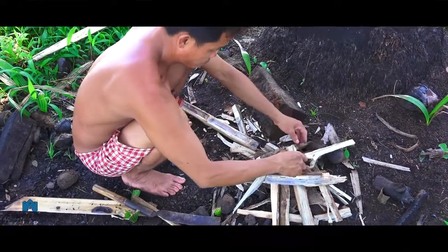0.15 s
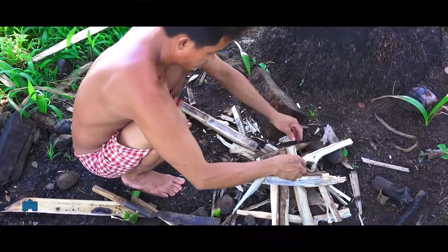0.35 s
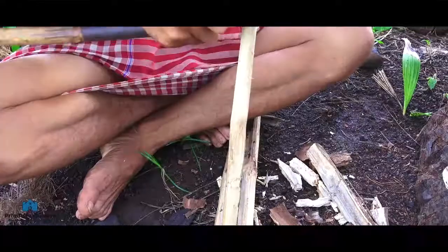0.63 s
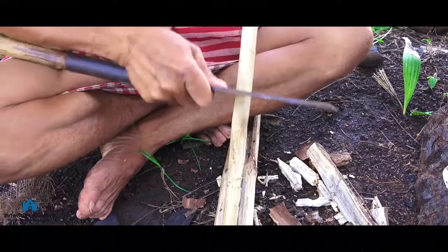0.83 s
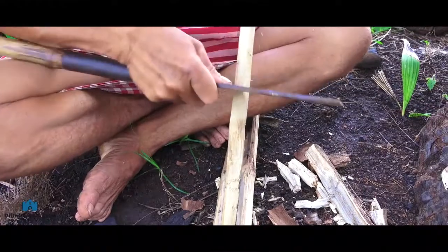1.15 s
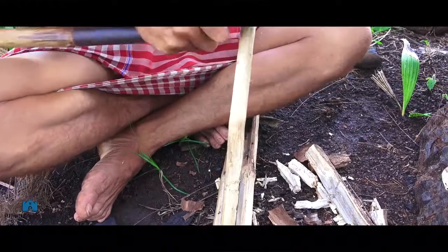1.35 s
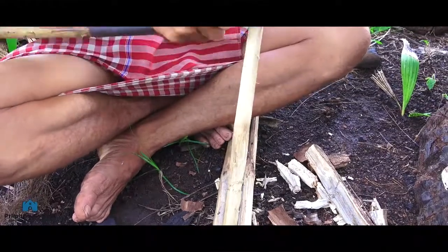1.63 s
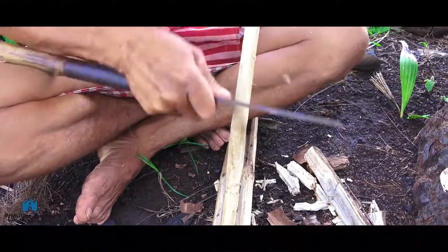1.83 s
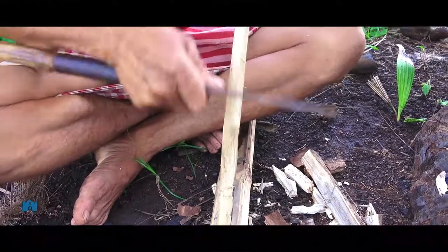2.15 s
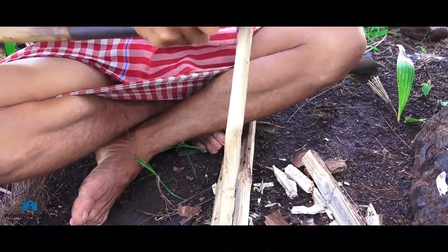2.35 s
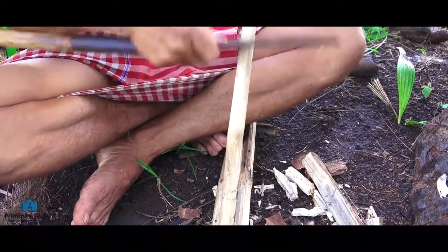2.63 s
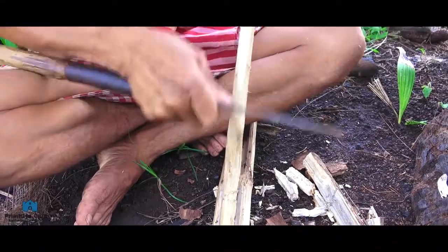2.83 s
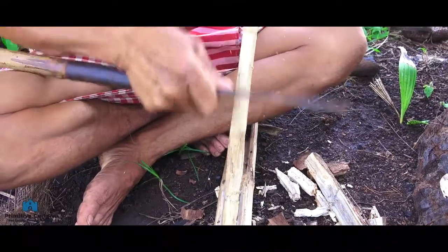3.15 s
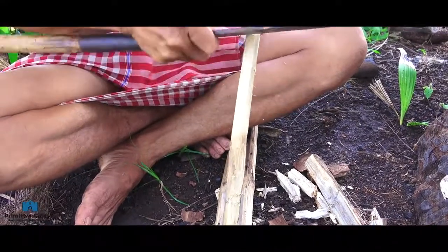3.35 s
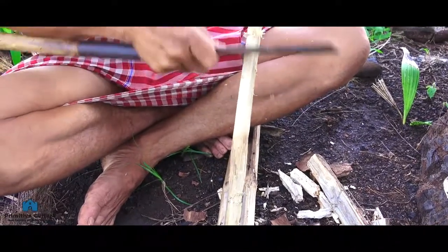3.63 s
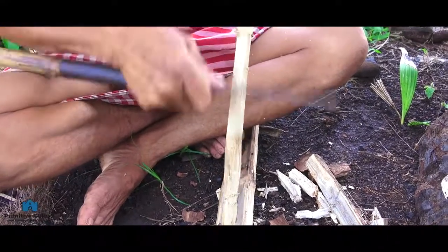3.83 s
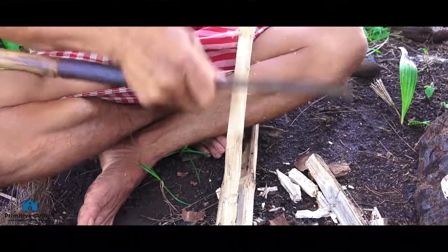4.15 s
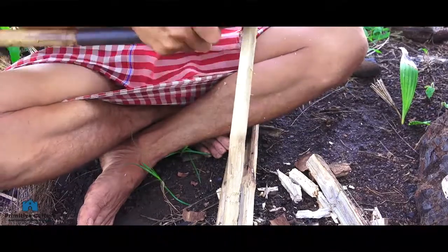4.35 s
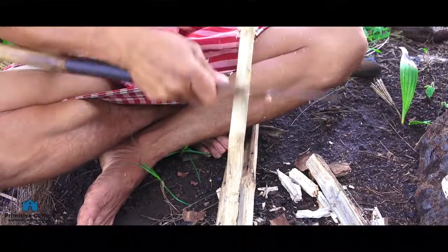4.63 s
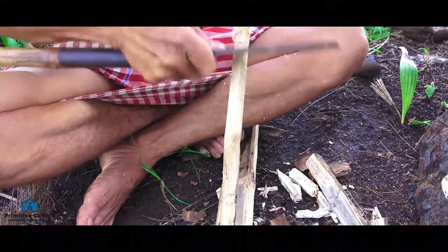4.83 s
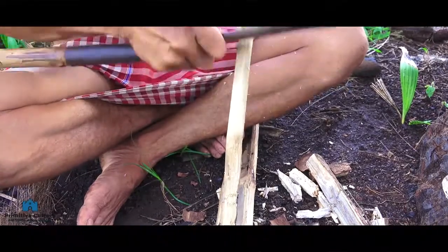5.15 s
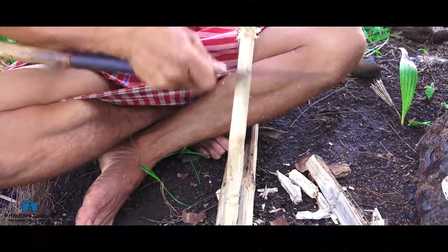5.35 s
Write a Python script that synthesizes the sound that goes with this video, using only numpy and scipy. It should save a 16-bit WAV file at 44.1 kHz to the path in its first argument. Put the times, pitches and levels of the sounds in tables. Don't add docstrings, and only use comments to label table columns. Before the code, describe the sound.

Close, dry scraping of a knife on wood, about three strokes a second, with hollow knocks between and faint leaf hiss behind.

```python
import sys
import numpy as np
from scipy import signal
from scipy.fft import rfft, irfft
from scipy.io import wavfile
from scipy.ndimage import uniform_filter1d, map_coordinates

SR = 44100
rng = np.random.default_rng(int(sys.argv[2]) if len(sys.argv) > 2 else 0)


def undo_db(level):
    steps = np.asarray(level, float) / 20
    return 10 ** steps


def wrap_up_sound(samples):
    columns = np.atleast_2d(samples).T
    tamed = np.clip(columns, -1, 1)
    steps = np.round(tamed * 32767).astype(np.int16)
    wavfile.write(sys.argv[1], SR, steps)


N = 242550


def evened(x):
    return x / np.sqrt(np.mean(x ** 2) + 1e-20)


def read(points, hz):
    f, value = np.transpose(points)
    return np.interp(np.log(hz + 1), np.log(f + 1), value)


def laid(tables, column, rest):
    out, t = np.full(N, float(rest)), np.arange(N) / SR
    for rows in tables:
        rows = np.array(rows)
        inside = slice(round(rows[0, 0] * SR), round(rows[-1, 0] * SR))
        out[inside] = np.interp(t[inside], rows[:, 0], rows[:, column])
    return out


def bumps(rows):
    t = np.arange(N) / SR
    return sum(undo_db(db) * np.exp(-((t - s) / half) ** 2) for s, half, db in rows)


def colour(x, points):
    return irfft(rfft(x) * undo_db(read(points, np.fft.rfftfreq(N, 1 / SR))), N)


def resonate(x, hz, width):
    r = np.exp(-np.pi * width / SR)
    return 2 * signal.lfilter([1 - r], [1, -r * np.exp(2j * np.pi * hz / SR)], x).real


def lumps(seconds):
    span = max(round(seconds * SR), 2)
    return evened(uniform_filter1d(uniform_filter1d(rng.standard_normal(N), span), span))


def blotchy(x, depth_db):
    z = signal.stft(x, nperseg=256)[2]
    patches = rng.standard_normal(z.shape[::-1])
    patches = uniform_filter1d(uniform_filter1d(patches, size=5, axis=0), size=6, axis=1)
    return signal.istft(z * undo_db(depth_db * evened(patches).T), nperseg=256)[1][:N]


def fibres(per_s, spread_db):
    size_db = spread_db * np.minimum(rng.exponential(1, N), 4)
    size = undo_db(size_db) * rng.choice([-1., 1.], N)
    return evened(size * (rng.random(N) < per_s / SR))


# middle in seconds, half length in seconds, level in dB.
GUSTS = [(.03, 0.057, -41), (.15, 0.098, -42.5), (.29, 0.048, -34), (.47, 0.047, -32.5),
         (.57, 0.017, -31.5), (1.06, 0.027, -51), (1.16, 0.018, -52), (1.47, 0.067, -48.5),
         (1.56, 0.032, -32.5), (1.68, 0.075, -44.5), (1.79, .04, -40), (1.88, 0.029, -37.5)]
# frequency in Hz, density in dB per Hz.
WIND_SPECTRUM = [(12, -32.5), (20, 7), (86, 4.5), (168, -1.5), (292, -19.5), (329, -13.5), (362, -34.5),
                 (500, -23.5), (650, -55.5), (1100, -120)]


def wind():
    lumpy = undo_db(2.0 * lumps(0.057))
    both, apart = (evened(colour(rng.standard_normal(N), WIND_SPECTRUM)) for _ in range(2))
    left_right_db = [[2.2], [-2.6]]
    air = both * undo_db(left_right_db) + 0.082 * apart * np.array([[1], [-1]])
    calm = signal.sosfilt(signal.butter(2, 54.6, "high", fs=SR, output="sos"), air)
    return lumpy * (bumps(GUSTS) * air + undo_db(-54) * calm)


# frequency in Hz, density in dB per Hz.
LEAVES_SPECTRUM = [(120, -7.5), (200, -9.5), (328, -13), (360, -15), (1870, -22), (3760, -24.5),
                   (5730, -24.5), (8900, -35.5), (11500, -36.5), (16000, -49)]
# time in seconds, level in dB.
LEAVES_LEVEL = [(0, -49), (.58, -48), (.62, -58), (2.5, -58), (5.5, -56.5)]
# frequency in Hz, side over mid in dB.
SIDE_OVER_MID = [(60, -15.5), (110, -5.5), (200, -7), (380, -28), (700, -10.5), (1290, -18.5),
                 (2380, -15.5), (5800, -19), (7200, 0.5), (12000, 2), (13200, -23)]


def leaves():
    both, apart = (evened(colour(rng.standard_normal(N), LEAVES_SPECTRUM)) for _ in range(2))
    swell = undo_db(1.0 * lumps(0.05))
    side = 0.97 * colour(apart, SIDE_OVER_MID) * np.array([[1], [-1]])
    return undo_db(laid([LEAVES_LEVEL], column=1, rest=-60)) * swell * (both + side)


# frequency in Hz, bandwidth in Hz, level in dB.
BLADE_MODES = [(1436, 40, -16), (1940, 25, -13), (2425, 124, -1), (3745, 78, 6.5), (4703, 43, -8.5),
               (5120, 110, -11), (6055, 140, -7.5), (6400, 70, -28), (7686, 93, -7.5), (8810, 420, -11.5),
               (10370, 130, -16.5), (12320, 130, -18.5)]


def steel(drive, ring_gain):
    modes = []
    for hz, width, db in BLADE_MODES:
        swell = undo_db(db + 3.6 * lumps(0.013) + 1.5 * lumps(0.072))
        modes.append(swell * resonate(drive, hz, width) / np.sqrt(width))
    levels_db = [db for _, _, db in BLADE_MODES]
    main = int(np.argmax(levels_db))
    scale = np.sqrt(sum(undo_db(db) ** 2 for db in levels_db) * np.pi / SR)
    return (sum(modes) + (ring_gain - 1) * modes[main]) / scale


# start in seconds, level in dB, fade in dB per second.
RETURNS = [(.72, -46.5, 79), (1.05, -47, 120), (1.38, -46, 115), (1.75, -45, 65.5), (2.09, -46, 142),
           (2.43, -46, 65.5), (2.78, -44, 129), (3.1, -43.5, 161), (3.43, -47.5, 94), (3.78, -49, 99.5),
           (4.12, -47, 170), (4.46, -43.5, 174), (4.82, -51, 102), (5.15, -43.5, 170)]
# middle in seconds, half length in seconds, level in dB.
RUSTLES = [
    (.46, .03, -56),
    (.885, 0.017, -63),
    (1.2, 0.033, -53),
    (1.81, 0.02, -45),
    (1.935, 0.019, -45.5),
    (2.265, 0.024, -54.5),
    (4.96, .03, -66),
    (2.55, .03, -56),
    (2.61, 0.042, -36.5),
    (3.6, 0.01, -75),
]
# start in seconds, level in dB, length in seconds.
TOUCHES = [(0.779, -39, 0.014), (1.116, -28.5, 0.013), (1.42, -37.5, 0.028), (1.8164, -30, 0.013),
           (2.163, -36, 0.013), (2.506, -27, 0.015), (2.85, -19, 0.017), (3.168, -23.5, 0.015),
           (3.594, -46, 0.015), (3.861, -32.5, 0.024), (4.1875, -24, 0.015), (4.537, -23, 0.013),
           (4.907, -28.5, 0.024), (4.995, -12, 0.014), (5.233, -25, 0.017)]
# frequency in Hz, density in dB per Hz.
DRAG_SPECTRUM = [(180, -35), (300, 3), (393, -10), (468, -9.5), (550, -4.5), (2770, -11.5), (3720, -3.5),
                 (7500, -10), (9750, -16), (16500, -120)]
RELEASE_S = 0.019


def returns():
    t = np.arange(N) / SR
    fading = sum(undo_db(db - fade * np.maximum(t - s, 0)) * (t > s - RELEASE_S) for s, db, fade in RETURNS)
    level = uniform_filter1d((fading + bumps(RUSTLES)) * undo_db(2.0 * lumps(0.0035)), 300)
    rub = fibres(5000, 3.8)
    fizz = signal.lfilter(*signal.butter(4, 7000, "high", fs=SR), rub)
    drag = evened(colour(rub, DRAG_SPECTRUM)) + evened(fizz) * undo_db(-9.5)
    brush = np.zeros(N)
    for s, db, length in TOUCHES:
        brush += undo_db(db - 15.5) * np.exp(-((t - s - 0.46 * length) / (0.39 * length)) ** 4)
    struck = uniform_filter1d(1. * (brush > level), size=900)
    brush *= rub
    ring = steel(undo_db(-13.0) * rub * level + undo_db(-10.5) * brush, 1.02 + 1.56 * struck)
    wide = undo_db(-7.0) * colour(brush, RASP_SPECTRUM) / np.std(colour(rub, RASP_SPECTRUM))
    skim = evened(signal.lfilter(*signal.butter(2, [400, 2600], "band", fs=SR), rub))
    approach = bumps([(row[0], 0.0082, -38.5) for row in KNOCKS])
    return drag * level + ring + wide + skim * approach


# start in seconds, length in seconds, pressure in dB,
# first bite in dB over pressure, blade ring in dB.
STROKES = [(0.605, 0.094, -13.5, -8, -2), (0.934, .1, -13.5, -4, -4), (1.274, 0.088, -15, -6, -1),
           (1.628, 0.098, -15, -1.5, -3), (1.976, 0.1, -14.5, -7, -2.5), (2.329, 0.09, -15.5, -1.5, 1),
           (2.668, 0.099, -14.5, -0.5, -1), (2.990, .097, -15, 3.5, -1), (3.328, 0.089, -14, -5.5, -2.5),
           (3.666, 0.098, -16.5, -0.5, 0.5), (4.003, 0.11, -16.5, -4.5, 0), (4.356, 0.094, -15, -7.5, -0.5),
           (4.706, 0.096, -17, 0.5, 3.5), (5.037, 0.1, -15, -5, 1.5), (5.419, 0.11, -16.5, -1.5, -2)]
# frequency in Hz, density in dB per Hz.
RASP_SPECTRUM = [(88, -66), (150, -21.5), (414, -12), (612, -17.5), (854, -18.5), (979, -12), (2140, -7.5),
                 (2450, -19), (2870, -10.5), (3770, -6), (4410, -7), (7620, -12.5), (16000, -46.5)]
ATTACK_S, SLACK_S, PEAK_AT = 0.013, 0.028, 0.77
FROM_DB, SLACK_DB, LIFT_DB, GONE_DB = -24, -3.5, -5.5, -38


def strokes():
    pushes = []
    for s, length, db, bite, ring in STROKES:
        pushes.append([(s, db + FROM_DB, ring),
                       (s + ATTACK_S, db + bite, ring),
                       (s + ATTACK_S + SLACK_S, db + SLACK_DB, ring),
                       (s + PEAK_AT * length, db, ring),
                       (s + length, db + LIFT_DB, ring),
                       (s + length + RELEASE_S, db + GONE_DB, ring)])
    pressure_db = laid(pushes, column=1, rest=-120) - 0.3 + 1.2 * lumps(0.0046)
    pressure = uniform_filter1d(undo_db(pressure_db), 60)
    tearing = fibres(14000, 2.6)
    rasp = undo_db(-8.0) * evened(blotchy(colour(tearing, RASP_SPECTRUM), 2.4)) * pressure
    ring_gain = undo_db(laid(pushes, column=2, rest=0) + 0.5)
    blade = undo_db(-4.0) * steel(tearing * pressure, ring_gain)
    waver = np.arange(N) + 5.37 * lumps(0.03) + 1.1 * lumps(0.006)
    return rasp + map_coordinates(blade, [waver], order=3, mode="nearest")


# start in seconds, length in seconds, level in dB,
# first pitch in Hz, last pitch in Hz.
FLEXES = [(0.606, 0.036, -30, 425, 396), (.942, 0.051, -18, 498, 307), (1.639, 0.055, -25, 490.3, 330.7),
          (1.989, 0.063, -21.5, 459.8, 305.7), (2.331, 0.025, -31, 410, 386),
          (2.681, 0.045, -17.5, 459, 329.7), (2.995, 0.059, -19.5, 489, 292),
          (3.669, 0.057, -39.5, 431.6, 383.4), (4.006, 0.064, -21, 520.3, 293.5),
          (4.371, 0.033, -20, 400, 371), (4.711, 0.046, -19.5, 455, 391.2), (5.037, 0.062, -23, 431, 393),
          (5.423, 0.051, -32.5, 424, 288.5)]
FLEX_RISE, FLEX_HOLD = 0.25, 0.44
FLEX_FROM_DB, FLEX_TO_DB = -5.5, -15
SPRING_HZ, SPRING_WIDTH_HZ, SPRING_DB, SPRING_S = 276, 270, -24.5, 0.011


def stick():
    bends = []
    for s, length, db, first, last in FLEXES:
        bends.append([(s, db + FLEX_FROM_DB, first),
                      (s + FLEX_RISE * length, db, first + FLEX_RISE * (last - first)),
                      (s + FLEX_HOLD * length, db, first + FLEX_HOLD * (last - first)),
                      (s + length, db + FLEX_TO_DB, last)])
    hz = laid(bends, column=2, rest=550) * (1 + .07 * lumps(0.00523))
    hum = np.sqrt(2) * np.sin(2 * np.pi * np.cumsum(hz) / SR)
    level_db = laid(bends, column=1, rest=-120) - 5.0 + 3.9 * lumps(0.0073)
    level = uniform_filter1d(undo_db(level_db), 200)
    dull = resonate(rng.standard_normal(N), SPRING_HZ, SPRING_WIDTH_HZ)
    dull = evened(resonate(dull, SPRING_HZ, SPRING_WIDTH_HZ))
    grind = evened(resonate(resonate(rng.standard_normal(N), 404, 140), 404, 140))
    springs = bumps([(s + length, SPRING_S, db + SPRING_DB) for s, length, db, _, _ in STROKES])
    return (hum + 0.21 * grind) * level + dull * springs


# time in seconds, blow in dB, low mode in Hz, middle mode in Hz,
# crack in dB over the blow.
KNOCKS = [(0.911, -10, 440, 2235, -30.5), (1.243, -9.5, 442, 2320, -31), (1.607, -9, 438, 1450, -32),
          (1.955, -9, 513, 1330, -34), (2.303, -9, 429, 2400, -38), (2.646, -7.5, 450, 1340, -42),
          (2.962, -9, 482, 1239, -36), (3.304, -9, 418, 1320, -12.5), (3.643, -10.5, 438, 1270, -35),
          (3.975, -14, 428.7, 1330, -26.5), (4.334, -7, 390, 1254, -36), (4.676, -10, 472, 1426, -5.5),
          (5.005, -31.5, 411, 1200, 15), (5.391, -6.5, 403, 1188, -22)]
# multiple of the low mode, level in dB, 60 dB decay in seconds.
WOOD_OVERTONES = [
    (1, 7, 0.043),
    (1.9, 3.5, 0.015),
    (3.1, -1.5, 0.039),
]
LOW_DB, LOW_SLOPE = -22, -0.83


def knocks():
    out, t = np.zeros(N + SR), np.arange(3000) / SR
    chance = rng.standard_normal((len(KNOCKS), 2, len(t)))
    high = signal.butter(2, 3500, "high", fs=SR)
    mid = signal.butter(2, [550, 2900], "band", fs=SR)
    rise = 1 - np.exp(-t / 0.0011)
    for (s, db, low_hz, mid_hz, crack_db), (a, b) in zip(KNOCKS, chance):
        low_db = LOW_DB + LOW_SLOPE * db
        low = sum(undo_db(low_db + d - 60 * t / t60) * np.sin(2 * np.pi * k * low_hz * t)
                  for k, d, t60 in WOOD_OVERTONES)
        glide = mid_hz * (t - 0.28 * 0.0024 * (1 - np.exp(-t / 0.0014)))
        body = undo_db(-4.0 - 60 * t / 0.026) * np.sin(2 * np.pi * glide)
        chatter_decay = undo_db(-60 * t / 0.021) + undo_db(-20.0 - 60 * t / 0.088)
        chatter = evened(signal.lfilter(*mid, a)) * chatter_decay
        crack_decay = undo_db(crack_db - 60 * t / 0.0037) + undo_db(crack_db - 33.0 - 60 * t / .12)
        crack = evened(signal.lfilter(*high, b)) * crack_decay
        thud = undo_db(low_db - 12.5 - 60 * t / 0.16) * np.sin(2 * np.pi * 170 * t)
        at = round(s * SR)
        out[at:at + len(t)] += undo_db(db) * rise * (low + body + chatter + crack + thud)
    return out[:N]


# middle in seconds, half length in seconds, level in dB.
CRACKLES = [
    (1.8, .03, -49),
    (2.6, 0.025, -35.5),
    (2.635, .008, -41),
]


def crackles():
    return bumps(CRACKLES) * evened(colour(fibres(500, 5.2), RASP_SPECTRUM))


# start in seconds, length in seconds, pitch in Hz, rise at mid call in Hz,
# level in dB.
CALLS = [
    (2.784, .09, 1093, -28.5, -57),
    (2.88, .065, 971, 58, -53),
    (3.144, .05, 1000, -17, -51),
    (3.202, .04, 1063, 18, -60),
    (5.255, .135, 4480, 168, -57.5),
]


def birds():
    arch = [(u, np.sin(np.pi * u)) for u in np.linspace(0, 1, 9)]
    edge_db = -12
    calls = [[(s + u * length, hz + rise * a, db + edge_db * (1 - a)) for u, a in arch]
             for s, length, hz, rise, db in CALLS]
    level = uniform_filter1d(undo_db(laid(calls, column=2, rest=-120) + 1.8 * lumps(.01)), 500)
    pitch = laid(calls, column=1, rest=740) + 25 * lumps(0.0062)
    return np.sqrt(2) * level * np.sin(2 * np.pi * np.cumsum(pitch) / SR)


# frequency in Hz, left over right in dB.
PORT_TILT = [(60, -1.5), (130, 2.5), (290, -1), (640, -1), (1410, 0.5), (3100, 0.5), (6820, 2), (15000, 2)]


def ports(x):
    t = np.arange(400) / SR
    scatter = rng.standard_normal(len(t)) * undo_db(-60 * t / 0.03)
    scattered = signal.oaconvolve(x, scatter / np.linalg.norm(scatter))[:N]
    side = colour(blotchy(scattered, 3.6), SIDE_OVER_MID) * undo_db(-9.5)
    half = [(hz, db / 2) for hz, db in PORT_TILT]
    left = colour(x, half) + side
    right = colour(x, [(hz, -db) for hz, db in half]) - side
    return np.array([left, right])


def scene():
    work = returns() + strokes() + stick() + knocks() + crackles() + birds()
    return wind() + leaves() + ports(work)


def band_limit(x):
    return signal.sosfilt(signal.butter(12, 17100, fs=SR, output="sos"), x)


def record(dry):
    thin = signal.sosfilt(signal.butter(2, 36, "high", fs=SR, output="sos"), dry)
    soft = 0.71 * np.tanh(thin / .7)
    band_end = signal.firwin(401, 15950, window=("kaiser", 8), fs=SR)
    mix = signal.oaconvolve(soft, band_end[None], "same")
    return band_limit(mix)


dry = scene()
out = record(dry)
wrap_up_sound(out)
```